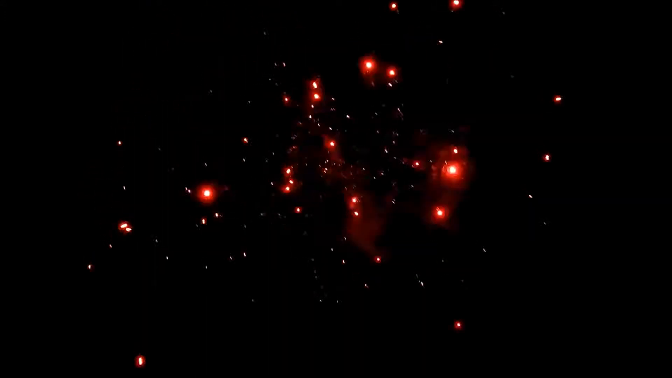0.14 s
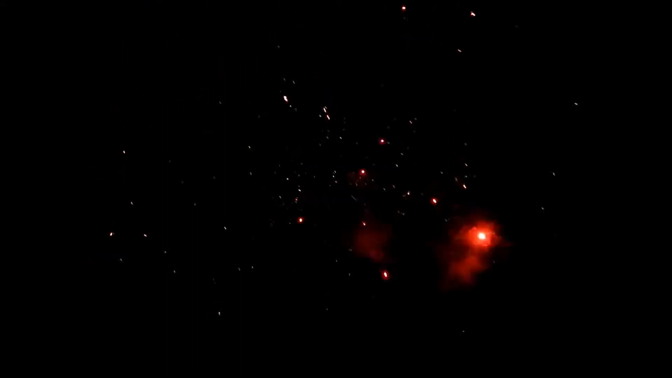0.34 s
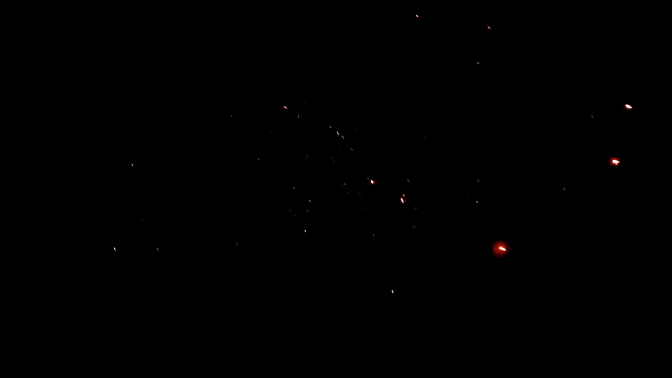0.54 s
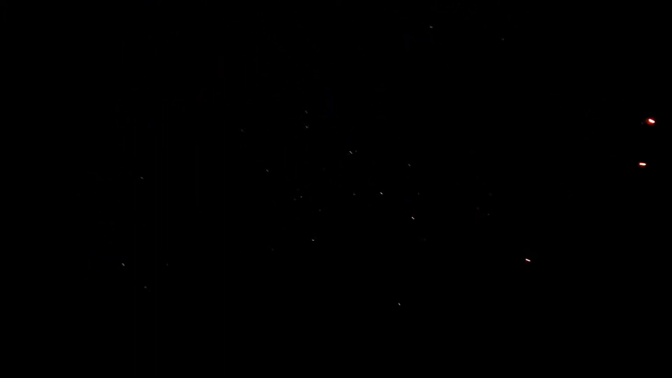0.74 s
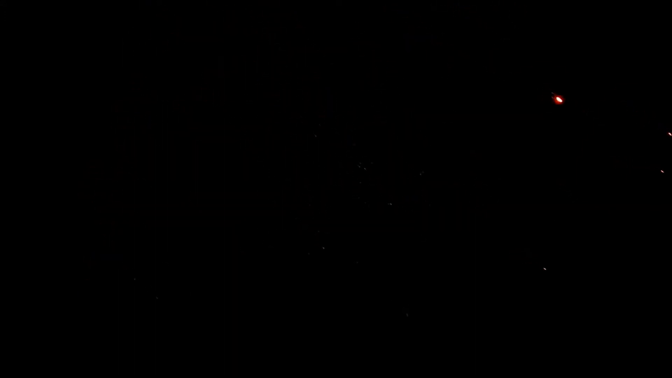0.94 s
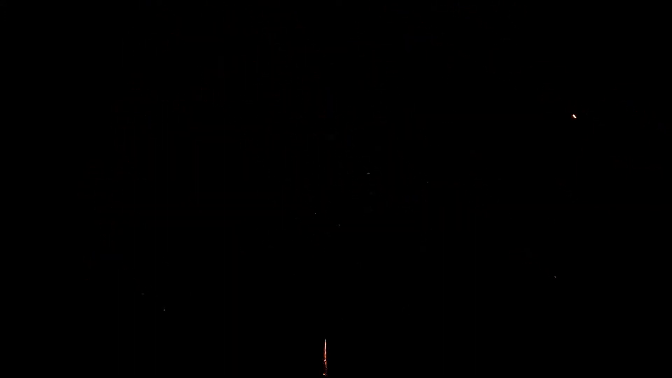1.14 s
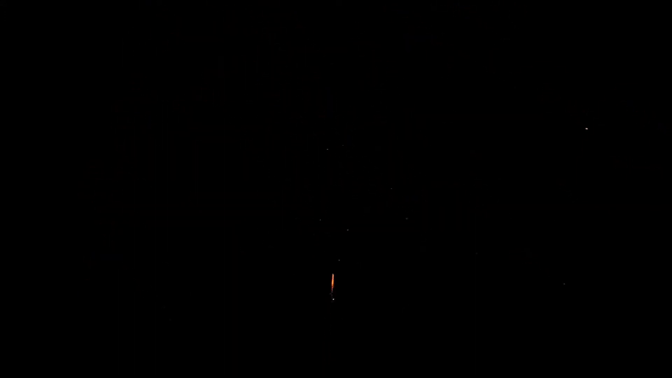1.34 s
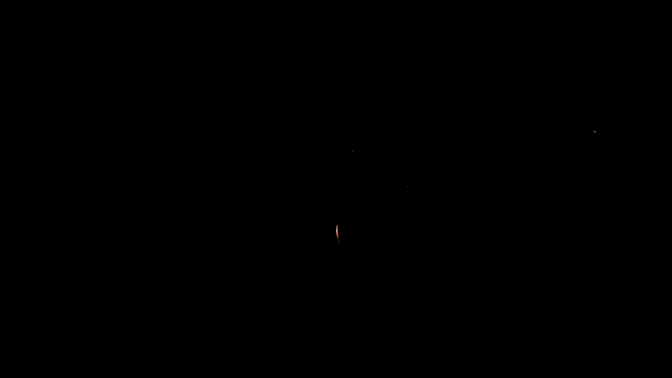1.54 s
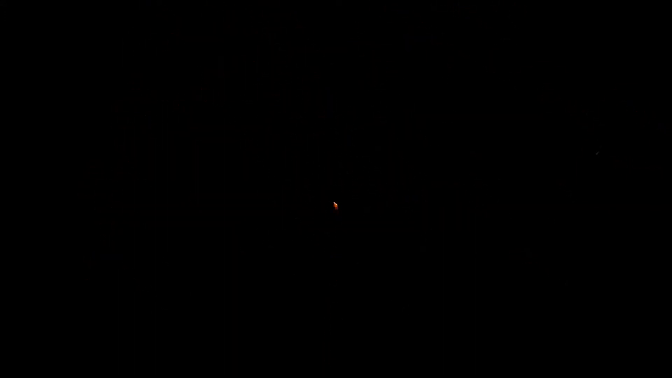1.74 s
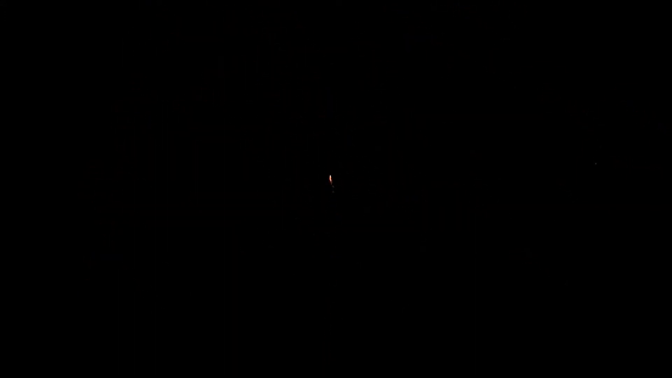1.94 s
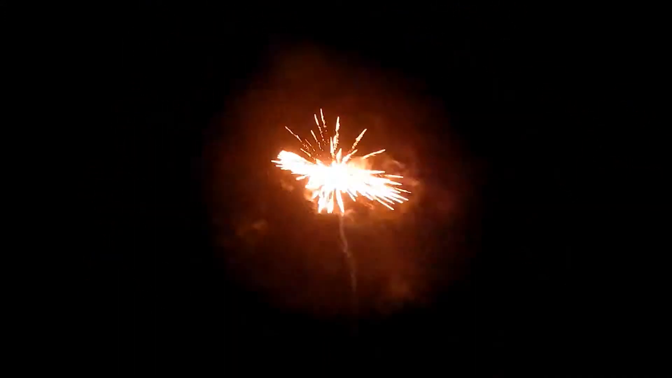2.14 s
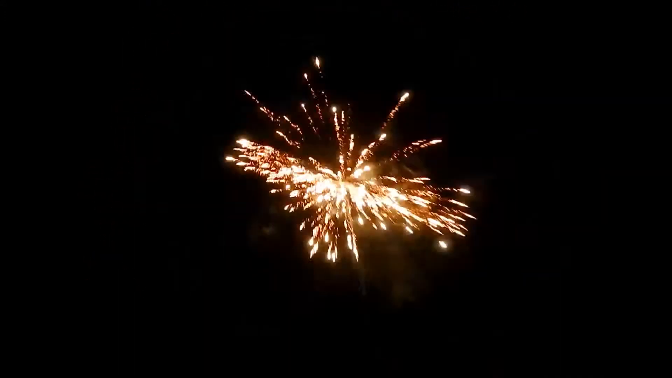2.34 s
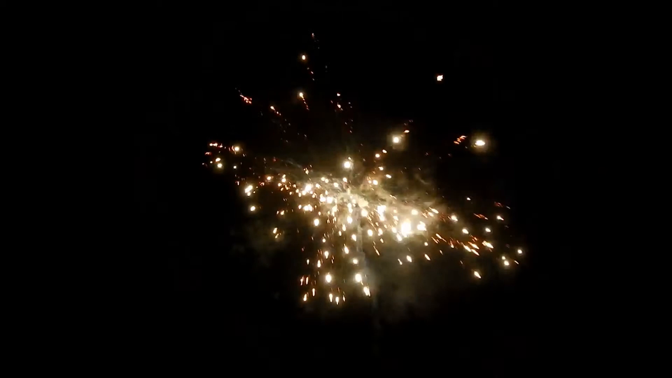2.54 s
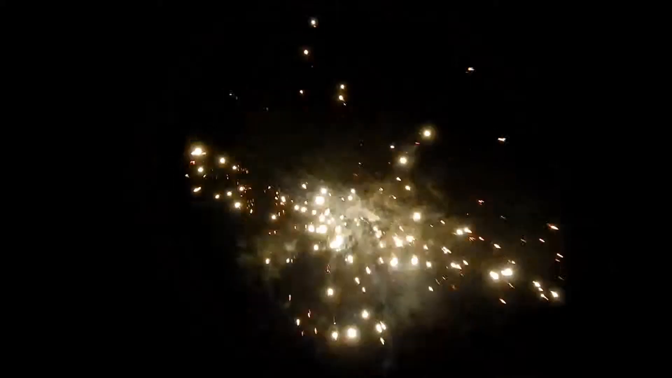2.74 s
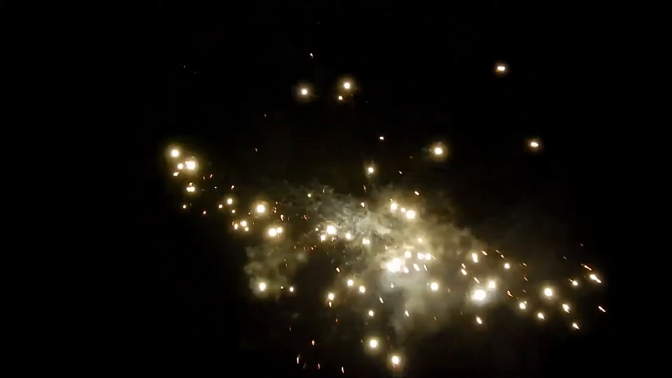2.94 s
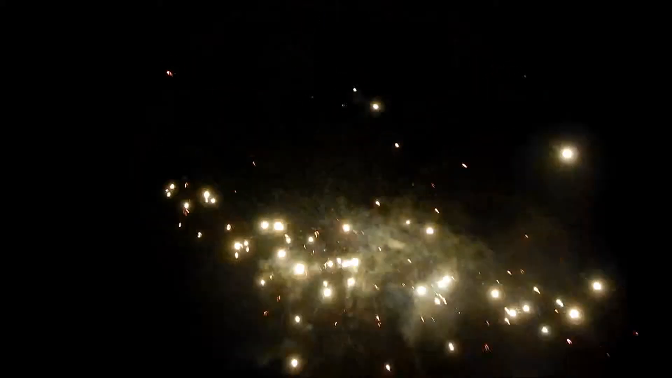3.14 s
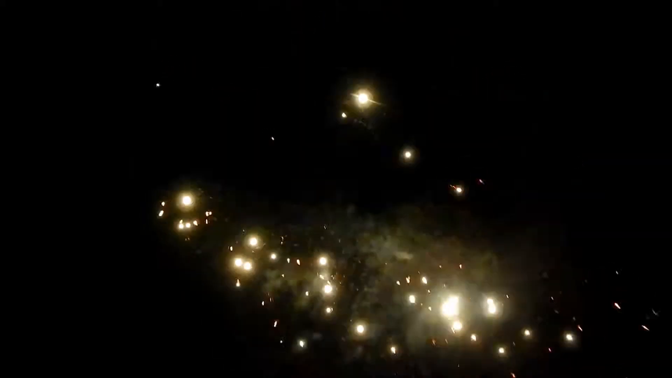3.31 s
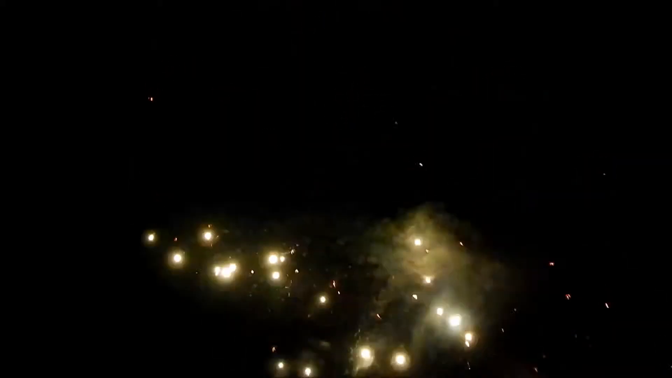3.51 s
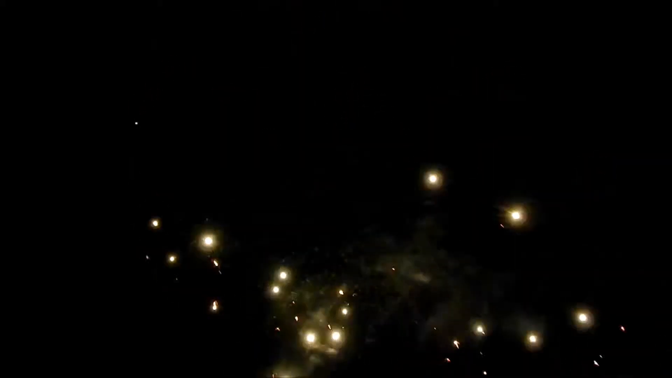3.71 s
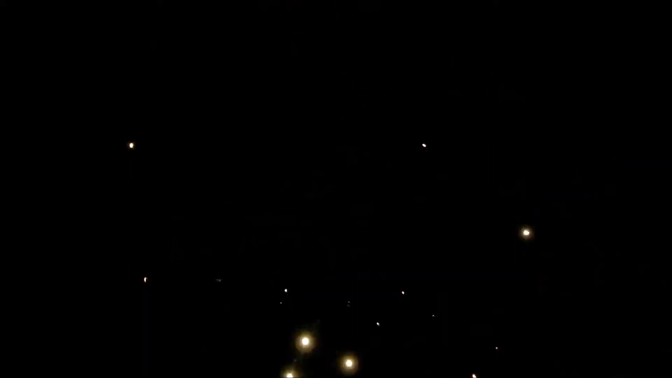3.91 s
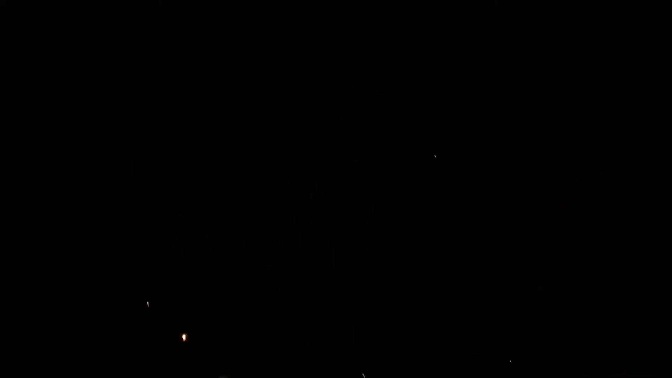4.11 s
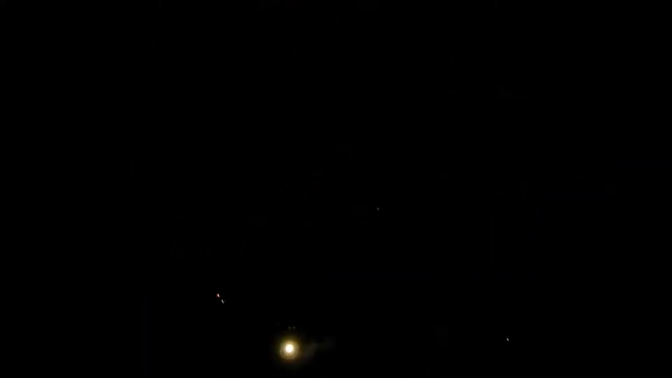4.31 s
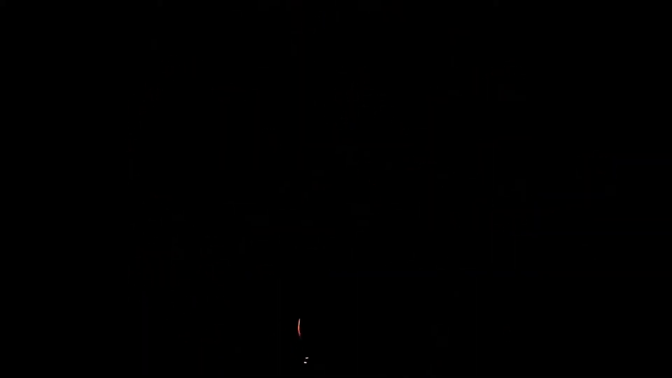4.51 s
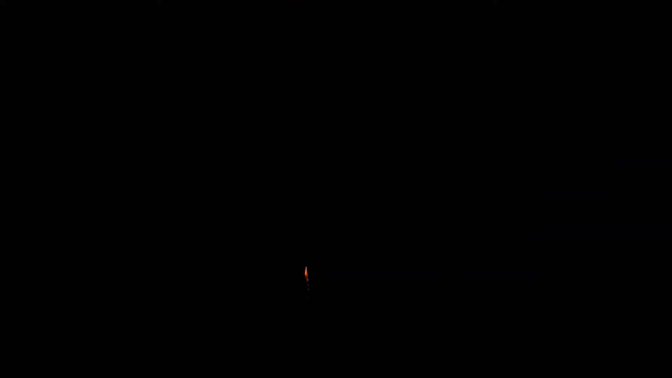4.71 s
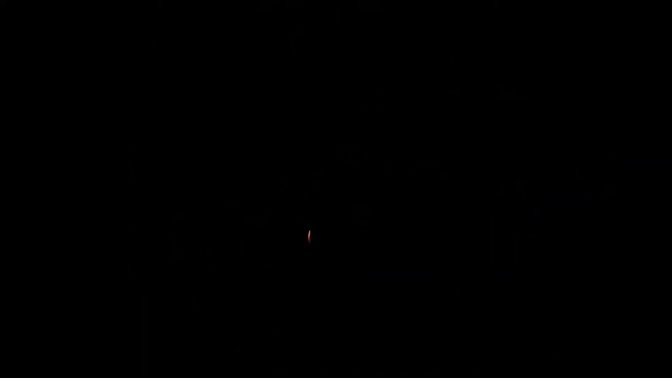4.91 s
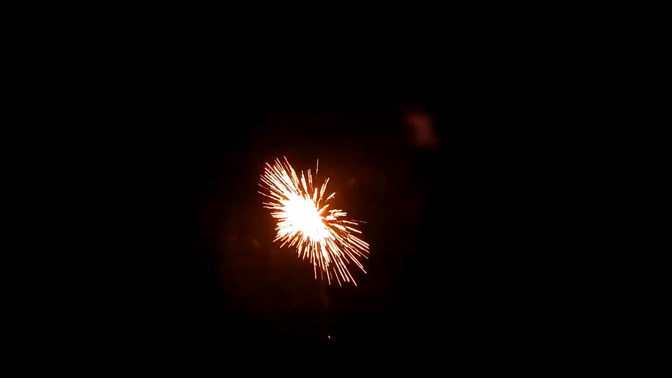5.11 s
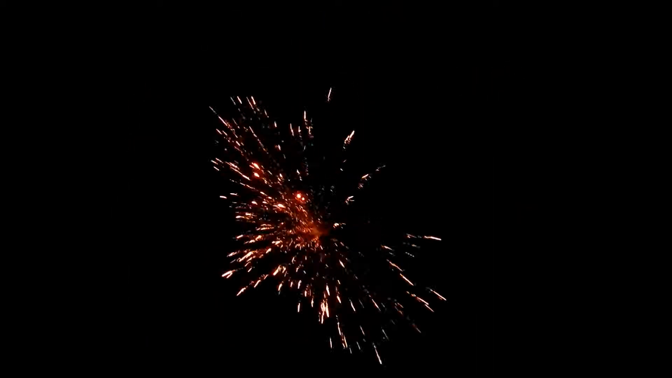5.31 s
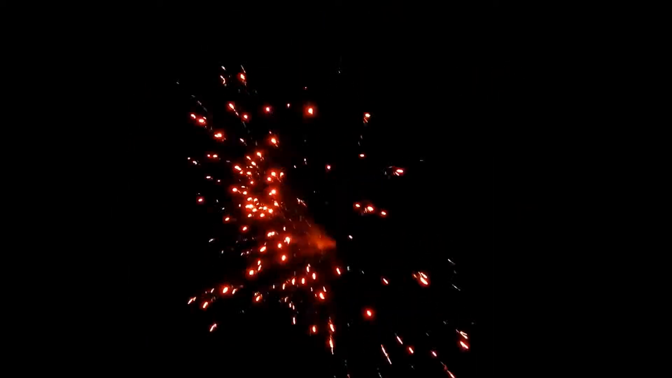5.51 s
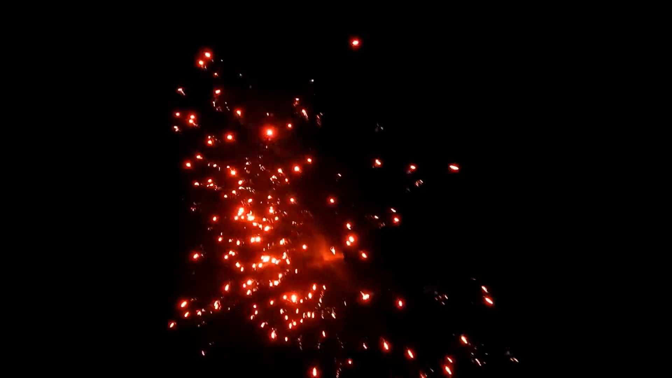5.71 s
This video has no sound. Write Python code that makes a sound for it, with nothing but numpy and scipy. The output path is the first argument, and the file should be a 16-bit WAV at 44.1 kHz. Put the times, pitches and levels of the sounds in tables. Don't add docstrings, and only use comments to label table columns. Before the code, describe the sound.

Four hard firework bangs at night, two launches and two overhead bursts in alternation, with short echoes, distant thuds and wind buffeting between.

```python
import sys
import numpy as np
from scipy import signal
from scipy.io import wavfile
from scipy.ndimage import uniform_filter1d

SR = 44100
rng = np.random.default_rng(int(sys.argv[2]) if len(sys.argv) > 2 else 0)


def volts(x):
    e = np.asarray(x, float) / 20
    return 10 ** e


def unload_audio(sound):
    columns = np.transpose(np.atleast_2d(sound))
    steps = np.round(np.clip(columns, -1, 1) * 32767)
    wavfile.write(sys.argv[1], SR, steps.astype(np.int16))


N = 253575

# (time [s], gain [dB])
GAIN = [(0, -8.5), (.5, -1), (.62, -15), (.89, -13.5), (1.02, -27), (1.48, -19.5), (1.78, -11), (2.2, -0.5),
        (2.48, -26), (3.34, -20.5), (3.74, -5.5), (3.83, -15), (4.08, -6.5), (4.33, -17), (4.5, -18),
        (5.18, -1), (5.62, -12.5), (5.75, -10)]
TOWN_DB = (-59, -58, -64.5, -68)
GAIN_SHARE = (.15, .15, 0.58, 1.02)
# (frequency [Hz], level [dB])
ROLL = [(29, -35.5), (50, -3), (91, -1), (113, -1.5), (243, -2), (280, -9.5), (330, -9.5), (430, -40.5),
        (730, -120)]
RUMBLE = [(160, -35), (280, -3), (488, 2), (578, -3.5), (632, -0.5), (810, -5.5), (1540, -14.5),
          (2460, -36.5), (3000, -41), (3900, -70), (6600, -120)]
RUSTLE = [(1060, -29.5), (1800, -1), (2340, -6.5), (2540, -11.5), (2750, -7), (3340, -9.5), (5200, -12.5),
          (6890, -38), (11700, -120)]
HISS = [(3530, -33), (6000, -5.5), (7310, -10), (10100, -9.5), (11000, -9.5), (13300, -12), (14900, -16),
        (15700, -20)]
# (frequency [Hz], likeness [1])
COHERENCE = [(60, 0.95), (150, 1), (380, 0.94), (950, 0.77), (2380, 0.11), (5980, 0.052), (15000, 0.095)]
# (start [s], rise [s], fade [dB/s], roll level [dB], rumble level [dB])
FAR_THUNDER = [
    (.15, 0.18, 32, -59, -50),
    (1.41, 0.01, 12, -41, -40),
    (2.043, 0.0062, 8, -38, -36),
    (2.9, 0.34, 6.5, -64, -52),
    (4.35, 0.047, 12.5, -41, -41.5),
    (4.85, 0.016, 16, -40, -36.5),
]
# (rise [s], fade [dB/s], roll, rumble, rustle level [dB])
LAUNCH_THUNDER = (0.28, 36, -50.5, -71.5, -95)
BURST_THUNDER = (0.28, 41, -49.5, -52.5, -66)
# (peak time [s], peak level [dB], spread [s], left minus right [dB])
GUSTS = [(.354, -52, 0.075, 6.5), (.51, -55.5, .03, 7.5), (.9, -69, .1, 2), (1.3, -57, .12, 6),
         (1.42, -50, .08, -4), (1.95, -59, 0.26, 6), (2.1, -28, 0.036, 3), (2.205, -33.5, .03, 9),
         (2.929, -70, 0.051, -9.5), (3.25, -66.5, .15, 2.5), (3.55, -59.5, .15, -1), (.2, -64, .1, -4),
         (4.3, -62.5, .05, -1.5), (1.78, -63, .08, 5), (4.77, -44, .04, 14), (3.73, -57, .03, 5),
         (4.081, -63, .1, -3), (4.37, -57.5, 0.063, -5), (4.6, -60, 0.13, 12), (4.861, -31.5, 0.086, 0.5),
         (5.0, -35.5, 0.098, -0.5), (5.201, -30, .05, 21), (5.62, -57.5, 0.16, 4.5)]
# (frequency [Hz], level [dB])
TURBULENCE = [(8.8, -32.5), (15, -3.5), (59, -4.5), (99, -2), (124, -4.5), (219, -15.5), (292, -34),
              (400, -27.5), (520, -59.5), (880, -120)]
# (time [s], pitch [Hz], level [dB])
WHISTLE = [(.24, 970, -58), (.3, 920, -60.5), (.37, 873, -50), (.43, 880, -56), (.48, 920, -58),
           (.5, 900, -81)]
DRONE = [(1.65, 88, -73), (1.8, 88, -56.5), (1.95, 90, -44), (2.1, 92, -43), (2.21, 92, -49.5)]

# (push [ms], suction damping [1], front blur [Hz], sharp share [1],
#                ring [Hz], ring width [Hz], ring gain [1])
TUBE = (0.57, 0.97, 2100, 0.24, 230, 170, 1.8)
SHELL = (.22, .8, 1500, .12, 110, 200, 4.0)
GROUND = (.52, .8, 3800, .1, 370, 440, 3.2)
SOIL = (.5, .7, 900, 0, 300, 300, 2.0)
WALL = (.34, .8, 1800, .15, 390, 70, 4.0)
HOUSE = (.16, .85, 1500, .2, 800, 250, 1.5)
FAR = (.25, .85, 1600, .01, 600, 400, 1.5)
# (time [s], peak level [dB], left minus right [dB], crack [dB])
LAUNCHES = [
    (.5474, -2.2, 1.2, -19.5),
    (3.7518, -2.4, 1.2, -27),
]
BURSTS = [
    (2.2172, -0.44, .8, -17.5),
    (5.2312, -0.29, 0.066, -23),
]
BOUNCES = [
    (2.2254, -5.5, 3, -23),
    (5.239, -4, -4.5, -22),
]
SHAKES = [
    (0.5439, -19, 0.067, -34.5),
    (3.7492, -19.5, 0.11, -27.5),
]
CLAPS = [
    (2.3908, -32, -2.1, -26),
    (5.408, -32, -3, -20),
]
KNOCKS = [(2.35, -40, .1, -27), (2.476, -38, .1, -18.5), (2.482, -41.5, .1, -19), (2.51, -39.5, .1, -18),
          (2.709, -45, .1, -21), (2.918, -45, 0.078, -18), (3.598, -41.5, 0.095, -42),
          (5.011, -44, .1, -23), (5.178, -39, .1, -33), (5.366, -37.5, 0.094, -28.5),
          (5.728, -40.5, 0.12, -37)]
# (delay [s], level re blast [dB], left minus right [dB], crack [dB])
FOOT = [
    (.0006, -14, 1.2, -30),
]
SLAPS = [
    (.0527, -20, -.7, -19),
    (.1633, -39, .5, -20),
]
# (time [s], peak level [dB], pitch [Hz], length [cycles])
PINGS = [
    (.338, -44, 480, 5),
    (1.436, -33, 190, 3.5),
    (1.657, -39, 660, 8),
    (1.808, -39, 600, 7),
    (2.066, -21, 190, 3.5),
    (2.74, -57, 1150, 12),
    (4.69, -62, 10500, 30),
    (4.691, -64, 6300, 20),
]
# (delay [s], level re blast [dB], pitch [Hz], length [cycles])
LAUNCH_PINGS = [
    (.0148, -26, 330, 2.5),
    (.0248, -27, 300, 2.5),
    (.0315, -25, 310, 2.5),
    (.0618, -28.5, 1000, 3.5),
    (.078, -34, 450, 3),
    (.2645, -44.5, 1080, 8),
]
# (frequency [Hz], t60 [s])
YARD_T60 = [(100, 0.34), (300, 0.37), (1000, 0.51), (3000, 0.36), (9000, 0.3656), (15000, 0.3)]
# (frequency [Hz], level [dB])
LAUNCH_YARD = [(70, -35.5), (250, 9.5), (600, -7.5), (1500, -15), (4000, -29.5), (10000, -33.5),
               (15700, -39.5), (16200, -72)]
BURST_YARD = [(60, -25), (250, 7.5), (600, -2.5), (1500, -14), (4000, -24.5), (10000, -26), (15700, -35.5),
              (16200, -82)]

# (time [s], rms level [dB], spread [s], top frequency [Hz])
CLOUDS = [(1.354, -64, 0.009, 5000), (1.39, -70, 0.024, 11300), (1.419, -50.5, 0.0083, 1980),
          (4.358, -50.5, 0.0065, 1800), (2.918, -56.5, .012, 2500), (2.984, -55, 0.035, 2464),
          (4.336, -71.5, 0.03, 11960), (5.022, -40.5, 0.014, 1890), (5.055, -45, 0.054, 2020),
          (5.11, -40, 0.014, 885), (5.729, -56, 0.011, 1900)]
# (delay [s], rms level re blast [dB], spread [s], top frequency [Hz])
LAUNCH_CLOUDS = [
    (0.096, -57, 0.0041, 4000),
    (0.341, -52, 0.026, 4260),
]
BURST_CLOUDS = [
    (0.209, -52, 0.0071, 2800),
    (0.303, -47.5, .035, 2760),
]
# (time [s], peak level [dB], ring [Hz], t60 [s])
THUDS = [
    (1.4088, -27, 560, 0.39),
    (2.0407, -15.5, 520, 0.34),
    (4.349, -25, 577, 0.19),
    (4.8462, -20, 619, 0.64),
]
# (frequency [Hz], level [dB])
SURVIVES = [(2400, -135), (3300, -108), (4300, -100), (7000, -104), (10500, -108), (15000, -104)]

DUCK_DB, DUCK_S = -28.5, .05
PUMP_DB, PUMP_BACK_S = -9, .3


def evened(x):
    return x / np.sqrt(np.mean(x ** 2) + 1e-20)


def read(points, hz):
    f, value = np.transpose(points)
    return np.interp(np.log(hz + 1), np.log(f + 1), value)


def levels(rows):
    s, *columns = np.transpose(rows)
    return [np.interp(np.arange(N) / SR, s, column) for column in columns]


def add(mix, s, sound):
    part = mix[:, round(s * SR):][:, :sound.shape[1]]
    part += sound[:, :part.shape[1]]


def panned(sound, pan_db):
    return sound * volts(np.array([[pan_db], [-pan_db]]) / 2)


def ring(x, hz, width):
    r = np.exp(-np.pi * width / SR)
    return signal.lfilter([1 - r, 0, r - 1], [1, -2 * r * np.cos(2 * np.pi * hz / SR), r * r], x)


def echoes(blasts, pattern):
    return [(s + delay, db + rel_db, *rest) for s, db, *_ in blasts for delay, rel_db, *rest in pattern]


def noise(colour, patchy_db, likeness=1., size=1024):
    frames = N * 4 // size + 5
    hz = np.fft.rfftfreq(size, 1 / SR)
    a, b, c, d, patches = rng.standard_normal((frames, len(hz), 5)).T
    patches = uniform_filter1d(patches, 6, 0)
    patches = evened(uniform_filter1d(patches, 5, 1))
    same = np.clip(likeness * read(COHERENCE, hz), -1, 1)[:, None]
    left = a + 1j * b
    right = same * left + np.sqrt(1 - same ** 2) * (c + 1j * d)
    z = np.array([left, right]) * volts(read(colour, hz)[:, None] + patchy_db * patches)
    sound = signal.istft(z, nperseg=size, noverlap=size * 3 // 4)[1]
    return evened(sound[:, :N])


def ducked(s):
    after = min([b for b, *_ in LAUNCHES + BURSTS if b > s] + [N / SR])
    return volts(DUCK_DB * np.clip((np.arange(N) / SR - after) / DUCK_S, 0, 1))


def swell(s, rise, fade_db):
    t = np.arange(N) / SR - s
    return np.clip(t / rise, 0, 1) ** 2 * volts(-fade_db * np.maximum(t - rise, 0)) * ducked(s)


def pumped():
    t = np.arange(N) / SR
    db = 0
    for s, *_ in LAUNCHES + BURSTS:
        db = db + PUMP_DB * np.clip((t - s) / DUCK_S, 0, 1) * np.exp(-abs(t - s) / PUMP_BACK_S)
    return volts(db)


def town():
    gain_db, = levels(GAIN)
    level = volts(np.c_[list(TOWN_DB)] + np.c_[list(GAIN_SHARE)] * gain_db) * pumped()
    for s, rise, fade_db, *db in FAR_THUNDER:
        thunder = volts(np.c_[db] + 0.44 * gain_db) * swell(s, rise, fade_db)
        level[:2] = np.hypot(level[:2], thunder)
    back = 0
    for rows, thunder in ((LAUNCHES, LAUNCH_THUNDER), (BURSTS, BURST_THUNDER)):
        rise, fade_db, roll_db, *db = thunder
        for s, *_ in rows:
            envelope = swell(s, rise, fade_db)
            level[1:3] = np.hypot(level[1:3], volts(np.c_[db]) * envelope)
            back = back + volts(roll_db) * envelope
    roll = level[0] * noise(ROLL, 0.98)
    rumble = level[1] * noise(RUMBLE, 2.2, size=512)
    returned = back * signal.lfilter(*signal.butter(4, 107, "high", fs=SR), noise(ROLL, 1.8))
    rustle = level[2] * noise(RUSTLE, 1.8, size=512)
    hiss = level[3] * noise(HISS + [(15900, -91.0)], 1.4, .8, size=512)
    return roll + rumble + returned + rustle + hiss


def wind():
    t = np.arange(N) / SR
    level = volts(-77.5) * pumped()
    for s, db, spread, pan_db in GUSTS:
        gust_db = db - 14 * abs((t - s) / spread) ** 2.0
        level = level + panned(volts(gust_db) * ducked(s), pan_db)
    return level * noise(TURBULENCE, 2.8, .1, size=2048)


def narrow(rows, width):
    hz, db = levels(rows)
    turn = np.exp(2j * np.pi * np.cumsum(hz) / SR)
    r = np.exp(-np.pi * width / SR)
    slow = rng.standard_normal(N) / turn
    for _ in range(2):
        slow = signal.lfilter([1 - r], [1, -r], slow)
    t = np.arange(N) / SR
    sounding = (t > rows[0][0]) & (t < rows[-1][0])
    return volts(db) * evened((turn * slow).real) * sounding


def whistle():
    return narrow(WHISTLE, 115) + narrow(DRONE, 15)


def pings():
    out = np.zeros((2, N))
    for s, db, hz, cycles in PINGS + echoes(LAUNCHES, LAUNCH_PINGS):
        t = np.arange(round(cycles / hz * SR)) / SR
        note = np.sin(2 * np.pi * hz * t) * np.hanning(len(t)) ** 0.35
        add(out, s, volts(db) * panned(note, .3))
    return out


def blast(crack_db, push_ms, damping, blur_hz, sharp, ring_hz, width, gain):
    ms = np.arange(2000) / SR * 1000
    wave = -(1 - ms / push_ms) * np.exp(-damping * ms / push_ms)
    front = signal.lfilter(*signal.butter(1, 9000, fs=SR), wave)
    wave = sharp * front + signal.lfilter(*signal.butter(2, blur_hz, fs=SR), wave)
    wave = wave + gain * ring(wave, ring_hz, width)
    wave = signal.lfilter(*signal.butter(2, 45, "high", fs=SR), wave)
    both, left, right = rng.standard_normal((3, len(ms)))
    jagged = [both + .9 * left, both + .9 * right]
    jagged = signal.lfilter(*signal.butter(2, [1300, 8500], "band", fs=SR), jagged)
    crack = jagged * np.exp(-(ms / 1.1) ** 2)
    crack += .8 * ring(jagged, 2600, 2200) * np.exp(-ms / 3.5)
    return wave / abs(wave).max() + volts(crack_db) * crack


def scatter(hiss, colour, gap_s):
    hz, t, z = signal.stft(hiss[:, :SR // 2], SR, nperseg=256)
    z = z * volts(read(colour, hz)[:, None] - 60 * t / read(YARD_T60, hz)[:, None])
    onset_s = np.where(hz > 1800, gap_s, .006)[:, None]
    z = z * np.clip(t / onset_s, 0, 1) ** 3
    return 0.18 * evened(signal.istft(z, SR, nperseg=256)[1])


def battery():
    out = np.zeros((2, N))
    shocks = ((TUBE, LAUNCHES), (SHELL, BURSTS), (GROUND, BOUNCES), (SOIL, SHAKES + echoes(LAUNCHES, FOOT)),
              (WALL, echoes(LAUNCHES, SLAPS)), (HOUSE, CLAPS), (FAR, KNOCKS))
    for shape, rows in shocks:
        for s, db, pan_db, crack_db in rows:
            add(out, s, volts(db) * panned(blast(crack_db, *shape), pan_db))
    white = [(20, 0), (20000, 0)]
    for rows, wet_db, colour, gap_s in ((LAUNCHES, -29.5, LAUNCH_YARD, .016), (BURSTS, -31.5, BURST_YARD, .012)):
        yard = scatter(noise(white, 2.1, size=256), colour, gap_s)
        for s, db, *_ in rows:
            add(out, s, volts(db + wet_db) * yard)
    return out


def clouds():
    out = np.zeros((2, N))
    colour = [(100, 4.0), (600, 3.3), (1500, 0.5), (5000, -16.0), (16000, -13.5)]
    swarm = noise(colour, 2.6, size=256)
    grain = evened(uniform_filter1d(rng.standard_normal(N), 90))
    swarm = swarm * volts(3.4 * grain)
    for s, db, spread, top_hz in CLOUDS + echoes(LAUNCHES, LAUNCH_CLOUDS) + echoes(BURSTS, BURST_CLOUDS):
        t = np.arange(-3 * spread, 3 * spread, 1 / SR)
        at = round((s - 3 * spread) * SR)
        part = signal.lfilter(*signal.butter(3, top_hz, fs=SR), swarm[:, at:at + len(t)])
        envelope = np.exp(-.5 * (t[:part.shape[1]] / spread) ** 2)
        add(out, at / SR, volts(db) * evened(part) * envelope)
    return out


def thuds():
    out = np.zeros((2, N))
    t = np.arange(SR // 2) / SR
    for s, db, hz, t60 in THUDS:
        paths = rng.standard_normal((2, len(t))) * (rng.random(len(t)) < 1500 / SR)
        paths[1] = .85 * paths[0] + .5 * paths[1]
        paths *= 0.36 * volts(-60 * t / t60) * (t > .006)
        bounces = np.cumsum(rng.uniform(.88, 1.12, 8)) - 1
        strength = np.exp(-(np.arange(8) / 6) ** 3) * rng.uniform(.7, 1, 8)
        paths[:, abs(bounces * SR / hz).astype(int)] -= strength
        dull = signal.sosfilt(signal.butter(4, 780, fs=SR, output="sos"), paths)
        sound = ring(dull, hz, 840) + ring(dull, 290, 330)
        add(out, s, volts(db) * sound / abs(sound).max())
    return out


def scene():
    return town() + wind() + whistle() + pings() + battery() + clouds() + thuds()


def top_cut(x):
    return signal.sosfilt(signal.butter(12, 16650, fs=SR, output="sos"), x)


def record(dry):
    resonant = dry + 0.86 * ring(dry, 10400, 2100)
    thin = signal.lfilter(*signal.butter(1, 25, "high", fs=SR), resonant)
    thin = signal.sosfilt(signal.butter(8, 15800, fs=SR, output="sos"), thin)
    hz, t, z = signal.stft(np.clip(thin, -1, 1), SR, "cosine", nperseg=2048)
    moody_db = 2.8 * rng.standard_normal((len(hz) // 24 + 1, len(t)))
    moody_db = np.repeat(moody_db, 24, 0)[:len(hz)]
    frugal_db = 1.5 + 2.4 * rng.standard_normal(len(t))
    kept = abs(z) > volts(read(SURVIVES, hz)[:, None] + moody_db + frugal_db)
    sparse = signal.istft(z * kept, SR, "cosine", nperseg=2048)[1][:, :N]
    mix = sparse + volts(-101.0) * rng.standard_normal((2, N))
    return top_cut(mix)


dry = scene()
out = record(dry)
unload_audio(out)
```